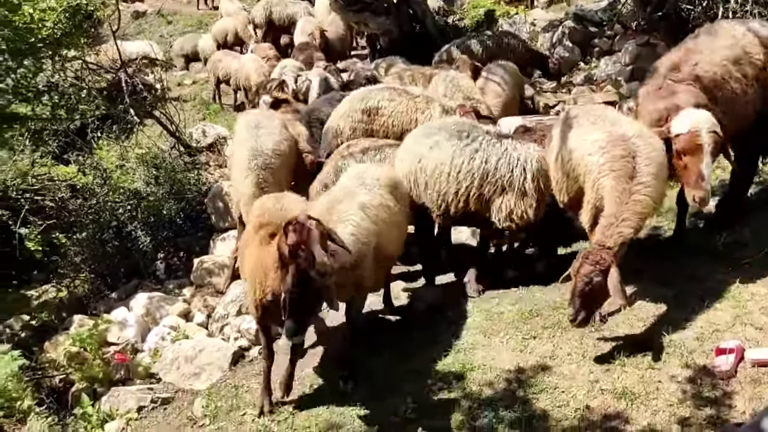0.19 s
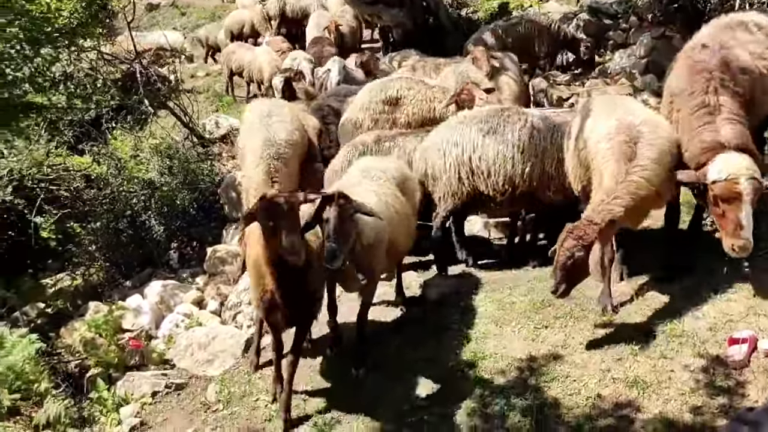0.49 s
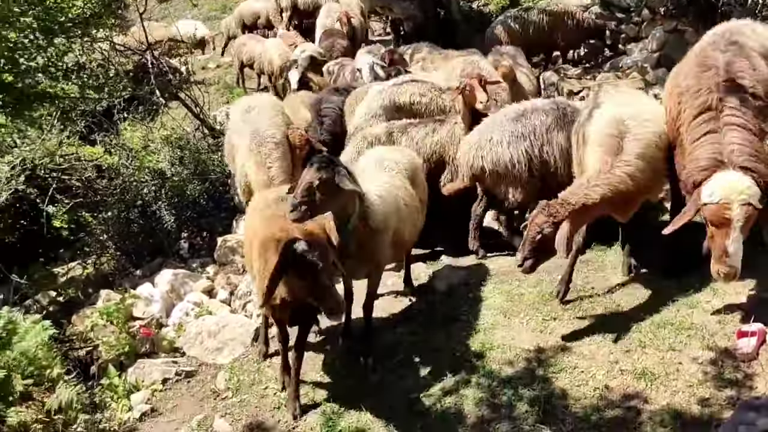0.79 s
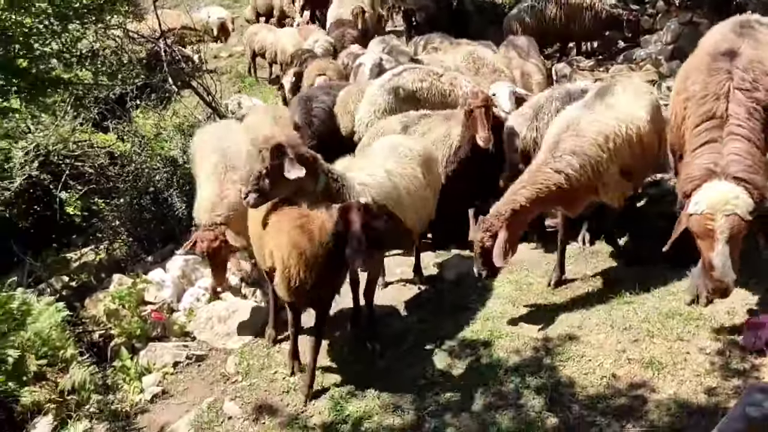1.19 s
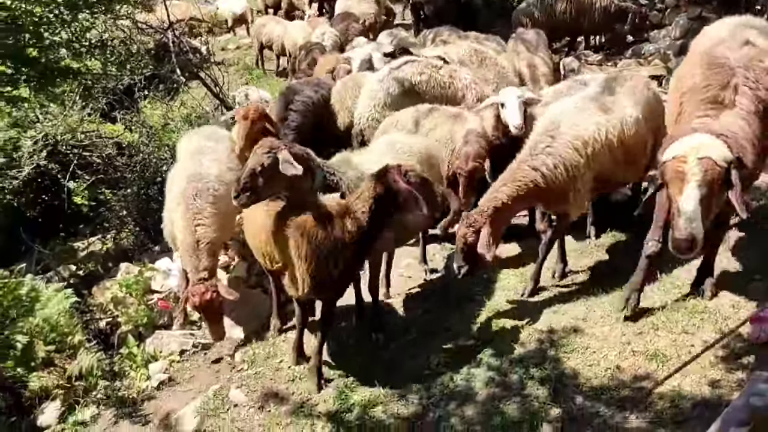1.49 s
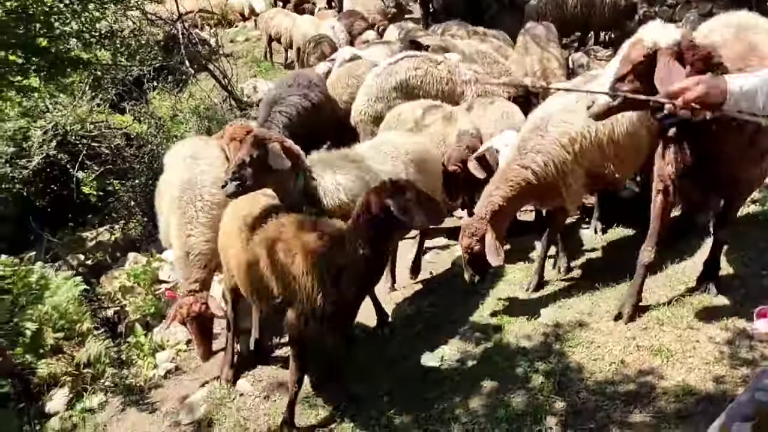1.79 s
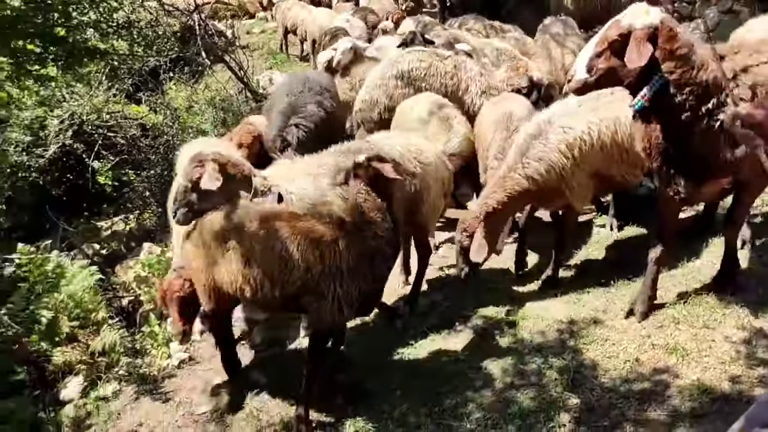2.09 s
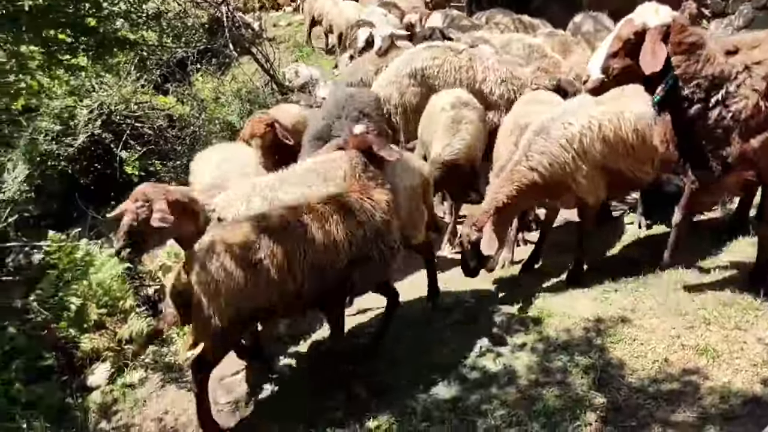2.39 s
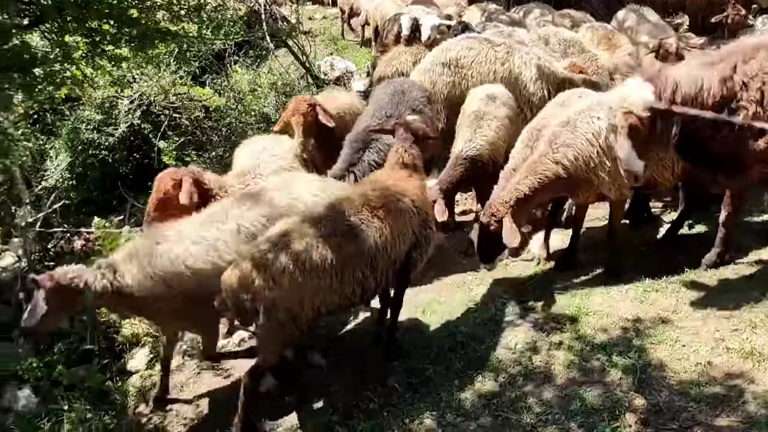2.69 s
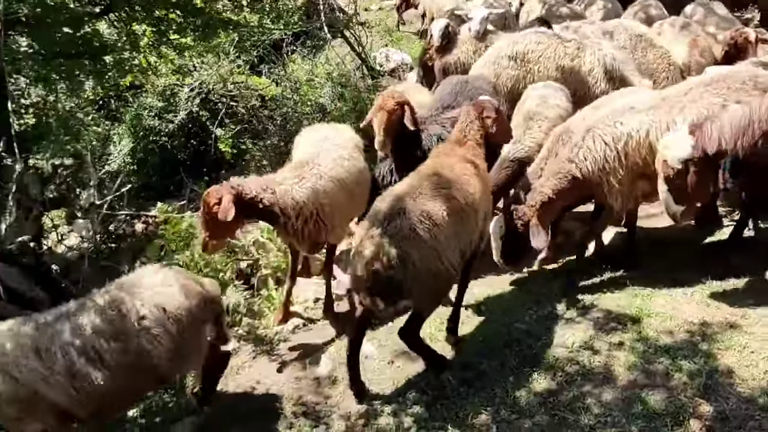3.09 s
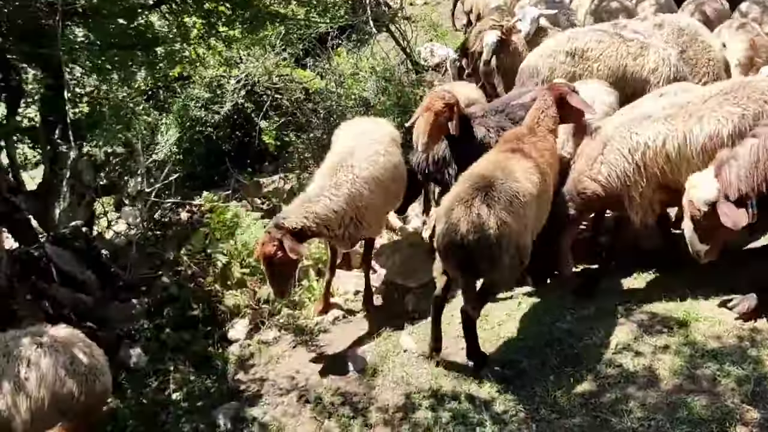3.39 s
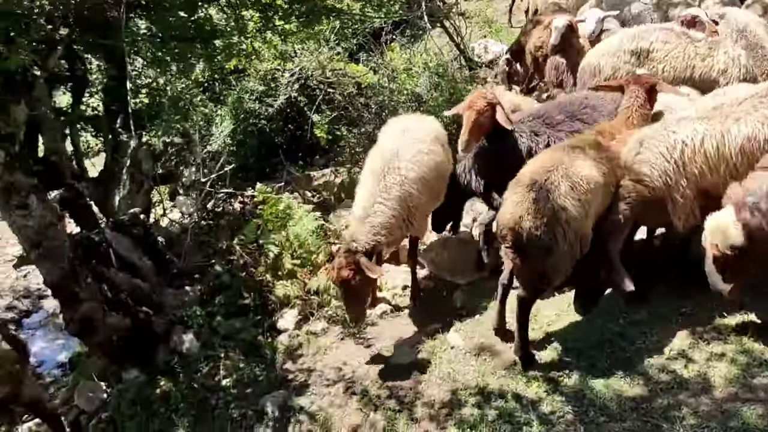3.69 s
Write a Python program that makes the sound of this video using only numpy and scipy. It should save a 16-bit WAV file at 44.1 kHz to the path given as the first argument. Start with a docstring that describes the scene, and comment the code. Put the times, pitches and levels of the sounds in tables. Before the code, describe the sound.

Close, clanky sheep bell rattles in two uneven bursts over wind rumble and dull hoof knocks

```python
"""A sheep close to a hand-held phone jangles its sheet-metal bell: each clapper blow rings decaying modes.
Faint low wavering tones ring behind: distant bells of the flock, and once a low mode of the near bell.
Hooves knock as dull puffs of noise. A thin high hiss of filtered noise swells in the middle, where
fluttering noise makes a sheep's snort. Lumpy low noise and rounded pushes of air buffet both microphone
ports, over a faint bed of field noise."""
import sys
import numpy as np
from scipy import signal
from scipy.fft import rfft, irfft, next_fast_len
from scipy.io import wavfile
from scipy.ndimage import uniform_filter1d, map_coordinates

SR = 44100
rng = np.random.default_rng(int(sys.argv[2]) if len(sys.argv) > 2 else 0)


def unload_wav(signal):
    """Save mono or channel-first audio to the path in sys.argv[1] as 16-bit WAV at rate SR, clipped to [-1, 1]."""
    wavfile.write(
        sys.argv[1],
        SR,
        np.round(np.clip(np.atleast_2d(signal).T, -1, 1) * 32767).astype(np.int16),
    )


def ratio_of_db(decibels):
    """Turn decibels (scalar or array-like) into linear amplitude factors; 0 dB maps to 1."""
    return 10 ** (np.asarray(decibels, float) / 20)


N = 167580  # samples, 3.8 s

# Strength curve of the wind at the ports: start_s, level_db (before each layer's own offset)
WIND_CURVE = [(0.0, -35.5), (0.19, -33.5), (0.27, -50.5), (0.39, -29.5), (0.48, -45.5), (0.93, -41),
              (0.94, -36.5), (1.17, -32), (1.21, -40.5), (1.36, -49), (1.49, -32.5), (1.72, -33.5),
              (1.86, -26.5), (2.87, -39.5), (3.34, -49), (3.8, -43)]


def unit(x):
    """Scale to rms 1."""
    return x / np.sqrt(np.mean(x ** 2) + 1e-20)


def along(points, hz):
    """Read (Hz, value) points on a log frequency axis."""
    f, v = np.transpose(points)
    return np.interp(np.log(hz + 1), np.log(f + 1), v)


def level(rows, **outside):
    """A (s, dB) curve, sample by sample."""
    return np.interp(np.arange(N) / SR, *np.transpose(rows), **outside)


def wobble(rate):
    """A smooth random curve, rate knots a second."""
    knots = rng.standard_normal(int(N * rate / SR) + 4)
    return map_coordinates(knots, [np.arange(N) * rate / SR])


def filtered(x, response):
    """Filter x by a complex response of frequency."""
    n = x.shape[-1]
    m = next_fast_len(n + 8192)
    return irfft(rfft(x, m) * response(np.fft.rfftfreq(m, 1 / SR)), m)[..., :n]


def closed(points):
    """A colour in (Hz, dB) that falls to -120 dB an octave beyond its ends."""
    low, high = (points[0][0] / 2, -120), (points[-1][0] * 2, -120)
    return lambda hz: ratio_of_db(along([low] + list(points) + [high], hz))


def rush(spectrum, alike, patchy_db):
    """Coloured stereo noise of rms 1, with patches of random gain in time and frequency."""
    z = signal.stft(rng.standard_normal((2, N)), nperseg=512)[2]
    patches = uniform_filter1d(rng.standard_normal(z.shape[1:]), 6, 0)
    patches = unit(uniform_filter1d(patches, 8, 1))
    pair = signal.istft(z * ratio_of_db(patchy_db * patches), nperseg=512)[1][:, :N]

    def middle_and_side(hz):
        # this split makes the correlation of left and right equal to alike
        turn = np.arccos(np.clip(along(alike, hz), -1, 1)) / 2
        return closed(spectrum)(hz) * [np.cos(turn), np.sin(turn)]

    mid, side = filtered(pair, middle_and_side)
    return unit(np.array([mid + side, mid - side]))


def add(out, s, sound):
    """Lay a sound into the buffer at a time in seconds."""
    place = out[..., max(round(s * SR), 0):]
    place[..., :sound.shape[-1]] += sound


def fade(t, t60, rise):
    """Quick rise, then exponential decay by 60 dB in t60 seconds."""
    return ratio_of_db(-60 * t / t60) * (1 - np.exp(-t / rise))


def hiss():
    """Thin high noise that swells in the middle, with brief swells on top."""
    # Long swell of the hiss: start_s, level_db (before brief swells and wobble)
    course = [(0.0, -50), (0.21, -44.5), (0.33, -48), (0.46, -56), (0.72, -43), (1.04, -51), (1.7, -46.5),
              (1.86, -34), (1.95, -37), (2.23, -29.5), (2.38, -43.5), (2.79, -49), (2.93, -41), (3.22, -60),
              (3.33, -47.5), (3.8, -49)]
    # Colour of the hiss: frequency_hz, density_db
    colour = [(1470, -19.5), (2500, -18.5), (3560, -16), (4240, -16.5), (5640, -18), (7630, 1), (10200, 4),
              (14300, -9.5), (14700, -53), (15200, -87)]
    # Correlation between the ports: frequency_hz, likeness
    likeness = [(8000, 0.75)]
    # Brief swells of the hiss: rustles, and at 2.265 s the snort's sharp high onset:
    # centre_s, rise_over_hiss_db
    brief_swells = [(1.16, 9.5), (1.42, 8.5), (1.664, 11.5), (2.265, 10), (3.209, 22)]
    swell_s = 0.01  # Gaussian width
    t = np.arange(N) / SR
    swell_db = sum(db * np.exp(-.5 * ((t - s) / swell_s) ** 2) for s, db in brief_swells)
    return ratio_of_db(level(course) + swell_db + wobble(14)) * rush(colour, likeness, patchy_db=2.2)


def wind():
    """Lumpy low rumble; lumps in part common to both ports, in part different at each."""
    # Colour of the rumble: frequency_hz, density_db
    colour = [(8.8, -37), (15, 2.5), (32, 0), (98, -5), (198, -11), (357, -31), (650, -33.5), (1100, -120)]
    own_db = 2.15 * np.array([wobble(7.83), wobble(11)])
    common_db = 1.76 * wobble(29.88)
    rumble = ratio_of_db(own_db + common_db) * rush(colour, [(30, 0.3)], patchy_db=1.5)
    return ratio_of_db(level(WIND_CURVE) - 2.0) * unit(rumble)


def puffs():
    """Short rounded pushes of air: a few strong ones, and many small eddies that follow the wind."""
    # Single strong puffs on the ports: centre_s, level_db, left_minus_right_db
    strong_puffs = [(0.127, -28.5, -10), (0.401, -32, 4), (1.123, -27, 16), (1.753, -29.5, 11),
                    (1.862, -19.5, 14), (2.06, -25, 11)]
    puff_ms, eddy_ms = 1.21, 3.3  # widths
    eddy_rate, eddy_db = 45, 7  # mean eddies a second at each port, dB over the wind curve
    strong = np.zeros((2, N))
    for s, db, pan_db in strong_puffs:
        port_db = db + np.array([pan_db, -pan_db]) / 2
        strong[:, round(s * SR)] = ratio_of_db(port_db) * rng.choice([-1, 1], 2)
    moments = rng.random((2, N)) < eddy_rate / SR
    eddies = moments * rng.standard_normal((2, N)) * ratio_of_db(level(WIND_CURVE) + eddy_db)
    t_ms = np.arange(-1000, 1001) / SR * 1000

    def push(x, ms):
        # a rounded pulse with a shallow recoil on both sides
        square = .5 * (t_ms / ms) ** 2
        pulse = (1 - square) * np.exp(-square)
        return signal.fftconvolve(x, pulse[None], "same", axes=1)

    return push(strong, puff_ms) + push(eddies, eddy_ms)


def field():
    """Faint patchy noise of the open field, its level wandering slightly."""
    # Colour of the field: frequency_hz, density_db
    colour = [(120, -83), (200, -2), (719, -10), (1040, 0.5), (1160, -10), (2230, -9.5), (3280, -18),
              (4480, -8), (7000, -6.5), (9100, -5), (15400, -120)]
    noise = rush(colour, [(500, 0.71), (4000, 0.033)], patchy_db=4.5)
    return ratio_of_db(-47 + 1.5 * wobble(6.4)) * noise


def clank(t, rise, contact_ms):
    """Dense short-lived modes with a longer rattle, as stereo noise, and the clapper's click."""
    # Colour of the dense modes: frequency_hz, density_db
    dense_colour = [(300, -19), (1500, -4), (3500, -29.5), (6000, -7.5), (8200, 6), (10000, 7.5),
                    (14000, -13)]
    # Colour of the click: frequency_hz, density_db
    click_colour = [(1500, 0), (6000, 0)]
    dense = unit(filtered(rng.standard_normal((2, len(t))), closed(dense_colour)))
    click = unit(filtered(rng.standard_normal(len(t)), closed(click_colour)))
    # levels in dB against the treble, t60 in s
    envelope = ratio_of_db(-6.5) * fade(t, 0.022, rise) + ratio_of_db(-13.5) * fade(t, 0.13, rise)
    # long contact softens the click
    return envelope * dense + ratio_of_db(-13) / (1 + contact_ms) * fade(t, .01, rise / 10) * click


def bell():
    """Each blow rings the mode families by where the clapper lands, each ear hearing its own mix."""
    # Clapper blows and slides: start_s, treble_db, hum_db, wall_db, broad_face_db, narrow_face_db,
    # contact_ms, place_degrees (on the rim)
    blows = [(0.0034, -34, -34, -46.5, -39.5, -41, 0.21, 72.0),
             (0.2024, -9, -17, -25, -15.5, -39, 1.3, 261.0),
             (0.2699, -12.5, -20.5, -25.5, -25, -13.5, 0.54, 336.0),
             (0.3531, -30, -38, -50, -28.5, -44, 1.8, 99.0),
             (0.4202, -8.5, -26, -31, -15.5, -21.5, 2.5, 168.0),
             (0.6491, -10, -19.5, -21, -10.5, -21, 3, 9.0),
             (0.7475, -23.5, -24, -34.3, -23, -52, 3.8, 309.0),
             (0.8151, -11.5, -37, -34, -11.5, -23, 2.4, 264.0),
             (0.8442, -22, -38.5, -33, -30, -25, 3.5, 264.0),
             (1.0186, -26, -28, -46.5, -31, -27, 0.7, 195.0),
             (1.0559, -25, -32, -43.5, -32.5, -26, 1.7, 288.0),
             (2.029, -9.5, -39.5, -30.5, -14, -20.5, 3.4, 24.0),
             (2.1478, -15.5, -42.5, -42, -57.0, -29, 3, 63.0),
             (2.3515, -20, -34, -37.5, -22.5, -25, 4.9, 66.0),
             (2.564, -32.0, -27.5, -38.5, -37, -36, 10.0, 54.0),
             (2.585, -12.5, -38, -36.5, -41, -28, 67, 72.0),
             (2.7146, -16, -27.5, -32, -38, -23.5, 0.96, 198.0),
             (2.7344, -15, -29.5, -35.5, -25.5, -17, 2.6, 63.0),
             (2.7728, -32.0, -29.5, -38.5, -31, -27, 3.1, 333.0),
             (2.8259, -30, -38, -44.5, -40, -47.0, 4.7, 252.0),
             (2.9693, -13.5, -11, -35, -41.0, -16.5, 2.4, 216.0),
             (3.0827, -10, -18, -33.5, -20.5, -16.5, 1.74, 150.0),
             (3.1754, -34, -37.0, -41.5, -42, -42, 1.5, 123),
             (3.2931, -13.5, -35.5, -36, -27, -25.0, 2.5, 219.0),
             (3.3637, -24.5, -28.5, -37, -32.5, -27, 2.2, 339.0),
             (3.5037, -16.5, -25.5, -31, -20, -19.5, 0.88, 285.0),
             (3.681, -28, -30.5, -47, -38, -32, 8.3, 201.0)]
    # Where the bell's mouth points: start_s, left_lead_ms, hum_left_minus_right_db
    bearing = [(0, 0.17, 0), (.75, 0.14, 0), (.82, 0.23, 9), (1.02, -0.049, 1.5), (2.6, -0.2, -4),
               (2.731, 0.13, 7.5), (2.97, -0.22, -0.5), (3.08, -0.38, 3), (3.36, -0.16, 2), (3.5, -0.37, 1),
               (3.8, -0.0011, -6)]
    # Modes of the cavity hum, faces and treble: frequency_hz, level_db (within family), t60_s
    hum = [(1032, 5, .16), (1034, -14, .45), (1062, -9, .1)]
    broad = [(7402, -9, .15), (7605, -10, .16), (7951, 0, .12)]
    narrow = [(6812, -13, .2), (8511, 0, .13), (8595, -8, .11)]
    treble = [(9625, -18, .11), (9857, -9, .1), (10520, -16, .08), (11040, -18, .07), (11700, -16, .08),
              (12275, -15, .08), (12720, -19, .07), (13300, -24, .05)]
    # Wall modes: frequency_hz, level_db, t60_s, swing_db (round the rim), phase_degrees, lobes (round the rim)
    wall_modes = [(2842, -11, .2, 5.4, 150, 1), (3020, -11.5, .2, 3.5, 264, 3),
                  (4091, -7, .14, 7.7, 191, 2), (4352, -5, .2, 3.4, 63, 3), (4618, -3.5, .17, 8.5, 147, 1),
                  (4826, -5.5, .22, 11, 275, 3), (5295, 0, .13, 2.7, 113, 2), (5372, -5, .2, 12.5, 71, 2),
                  (6100, -11.5, .1, 14.5, 191, 3), (6330, -6.5, .1, 8, 171, 3)]
    # Each mode's strength and phase waver at random, so the ring sounds slightly rough
    rough, wall_rough, hum_rough = .5, .35, .12  # depths; the treble takes double
    slide_rough, rough_hz = 0.059, 130  # added depth per ms of contact, knots a second
    wall_loose, scatter_db = .5, 3  # the wall varies less from blow to blow
    rest_s, rest_t60, keep_db = .12, .16, -4  # resting clapper damps; the next blow lowers the old ring

    out, t = np.zeros((2, N + SR)), np.arange(SR * 2 // 5) / SR
    ear = np.array([[1], [-1]])  # left, right
    knots = rng.standard_normal((2, 4000))
    flutter = np.interp(np.arange(4 * SR) * rough_hz / SR, np.arange(4000), knots[0] + 1j * knots[1])
    when, lead_ms, hum_pan = np.transpose(bearing)
    next_blows = [blow[0] for blow in blows[1:]] + [N / SR]
    for blow, after in zip(blows, next_blows):
        s, treble_db, hum_db, wall_db, broad_db, narrow_db, contact_ms, place = blow
        wall = []
        for hz, db, t60, swing_db, phase, lobes in wall_modes:
            place_db = swing_db * np.cos(np.radians(lobes * place - phase))
            wall.append((hz, db + place_db, t60))
        rise = max(contact_ms, .2) / 1000
        lead = ear * np.interp(s, when, lead_ms) / 2000  # s, half to each ear
        hum_ear_db = hum_db + ear * np.interp(s, when, hum_pan) / 2
        ring = ratio_of_db(treble_db) * clank(t, rise, contact_ms)
        # level, modes, variation from blow to blow, flutter depth, rise in s
        families = [(hum_ear_db, hum, 0, hum_rough, rise + 0.00093),
                    (wall_db, wall, wall_loose, wall_rough, rise),
                    (broad_db, broad, 1, rough, rise),
                    (narrow_db, narrow, 1, rough, rise),
                    (treble_db, treble, 1, 2 * rough, rise)]
        for db, modes, loose, depth, swell in families:
            for hz, mode_db, t60 in modes:
                size, lean, phase, skew = loose * rng.standard_normal(4)
                mode_ear_db = db + mode_db + scatter_db * size + 3.6 * lean * ear
                gain = ratio_of_db(mode_ear_db) * fade(t, t60, swell)
                stretch = flutter[rng.integers(3 * SR):][:len(t)]
                shake = 1 + (depth + loose * slide_rough * contact_ms) * stretch
                # only modes below 6500 Hz take the lead between the ears
                angle = 2 * np.pi * hz * (t + lead * (hz < 6500)) + phase + 0.96 * skew * ear
                ring += gain * np.imag(shake * np.exp(1j * angle))
        rest_db = -60 * np.maximum(t - rest_s, 0) / rest_t60
        struck_again_db = keep_db * np.clip((t + s - after) / 0.0008, 0, 1)
        add(out, s, ring * ratio_of_db(rest_db + struck_again_db))
    return out[:, :N]


def yard(x):
    """Scattered echoes from flock, trees and slope: a decaying noise tail, its t60 set by frequency."""
    # Decay of the echoes: frequency_hz, t60_s
    decay = [(500, 0.13), (4000, 0.2), (12000, 0.051)]
    hz, t, z = signal.stft(rng.standard_normal((2, SR // 2)), SR, nperseg=256)
    tail = signal.istft(z * ratio_of_db(-60 * t / along(decay, hz)[:, None]), SR, nperseg=256)[1]
    late = np.pad(x, ((0, 0), (300, 0)))  # samples before the first echo
    return signal.fftconvolve(late, tail / np.linalg.norm(tail[0]), axes=1)[:, :N]


def hooves():
    """Hooves knock on the ground as dull short puffs of noise, alike at both ports."""
    # Hoof knocks: start_s, level_db (before the envelope)
    knocks = [(0.156, -34), (1.369, -33), (1.441, -33), (1.659, -34.5), (1.863, -27), (2.076, -26.5),
              (3.376, -30)]
    # Colour of a knock: frequency_hz, density_db
    colour = [(80, -53), (250, -3), (800, -1), (2000, -14), (6000, -44)]
    out, t = np.zeros((2, N + SR)), np.arange(SR // 5) / SR
    for s, db in knocks:
        thud = unit(filtered(rng.standard_normal(len(t)), closed(colour)))
        add(out, s, ratio_of_db(db) * fade(t, 0.06, 0.0059) * thud)
    return out[:, :N]


def faint_tones():
    """Faint low tones, decaying sines that waver slightly in phase: distant bells and a near-bell mode."""
    # Distant bells, and at 2.752 s a low mode of the near bell:
    # start_s, level_db (before the envelope), pitch_hz
    tones = [(0.361, -45, 827), (.539, -54.5, 808), (.85, -44.5, 1145), (.87, -43, 956),
             (1.264, -48.5, 914), (1.293, -45.5, 942), (1.444, -38, 928), (1.92, -46, 935),
             (2.03, -42.5, 1166), (2.487, -44.5, 935), (2.752, -47, 1668), (2.929, -46, 892),
             (3.3, -45.5, 1124), (3.36, -48, 815), (3.52, -47, 790), (3.74, -48.5, 820)]
    out, t = np.zeros(N + SR), np.arange(SR // 2) / SR
    drift = 0.035 * 2 * np.pi * wobble(20)  # radians
    for s, db, hz in tones:
        waver = drift[round(s * SR) // 2:][:len(t)]
        tone = np.sin(2 * np.pi * hz * t + waver)
        add(out, s, ratio_of_db(db) * fade(t, 0.58, 0.0009) * tone)
    return out[:N]


def snort():
    """A burst of air through fluttering nostrils: noise whose level ripples at an unsteady rate."""
    # Course of the snort: start_s, level_db (before the flutter)
    course = [(2.24, -45.5), (2.28, -23.5), (2.305, -25), (2.345, -36.5)]
    # Colour of the breath: frequency_hz, density_db
    colour = [(470, -10), (800, -14.5), (2950, -4), (4820, -2), (8500, 0.5), (13700, -9.5), (15200, -66)]
    flutter_hz, flutter_db = 64.8, 2  # mean rate, depth
    phase = 2 * np.pi * flutter_hz * np.arange(N) / SR + 2.05 * wobble(31.92)
    breath_db = level(course, left=-120, right=-120) + flutter_db * np.sin(phase)
    return ratio_of_db(breath_db) * rush(colour, [(3000, 0.31)], patchy_db=-5.0)


def scene():
    """All sources, the bells and hooves with echoes 10 dB down."""
    struck = bell() + faint_tones() + hooves()
    air = hiss() + snort() + wind() + puffs() + field()
    return struck + ratio_of_db(-10) * yard(struck) + air


def top_cut(x):
    """Nothing passes above the cut-off."""
    return signal.sosfilt(signal.butter(12, 15300, fs=SR, output="sos"), x)


def record(dry):
    """Two microphone ports with their own colour, a steep treble roll-off and soft clipping."""
    # Difference between the ports: frequency_hz, left_minus_right_db
    port_colour = [(60, -3.5), (300, -1), (1500, 0.5), (4400, 0), (5500, -4.5), (6800, 1.5), (8300, -11),
                   (9200, -2.5), (9900, 6.5), (12000, 2), (14500, 7)]
    top_hz, ceiling = 14400, .9  # roll-off, full scale = 1
    half = np.array([[.5], [-.5]])  # left, right

    def ports(hz):
        return ratio_of_db(half * along(port_colour, hz)) / np.sqrt(1 + (hz / top_hz) ** 60)

    x = filtered(dry, ports)
    mix = x / (1 + np.abs(x / ceiling) ** 6) ** (1 / 6)
    return top_cut(mix)


dry = scene()
out = record(dry)
unload_wav(out)
```